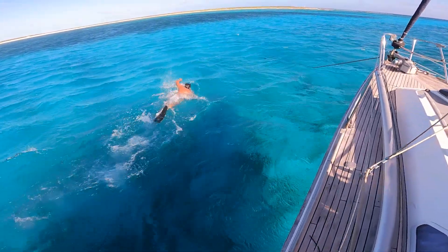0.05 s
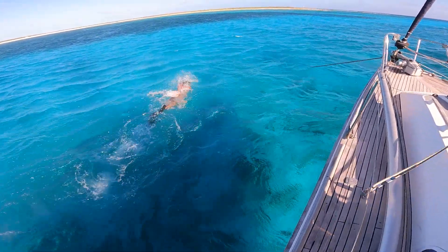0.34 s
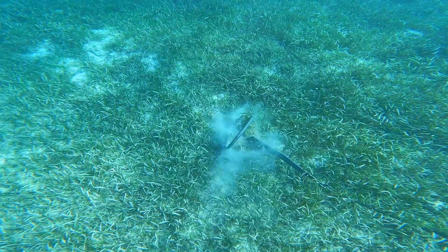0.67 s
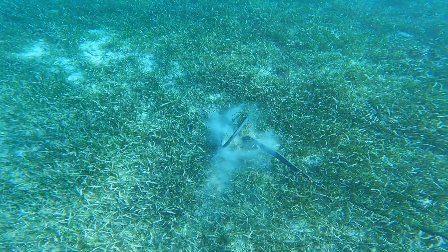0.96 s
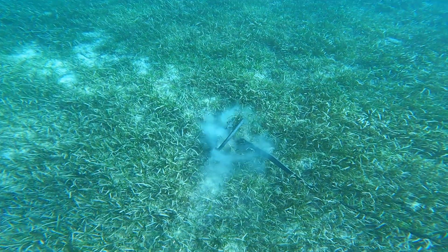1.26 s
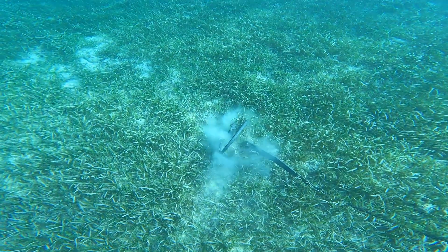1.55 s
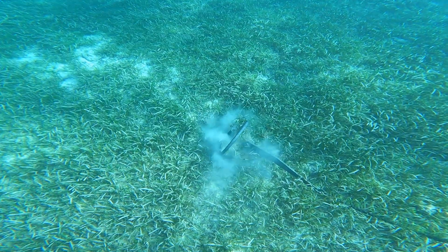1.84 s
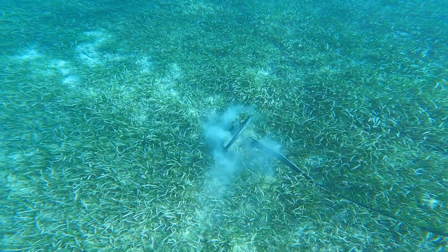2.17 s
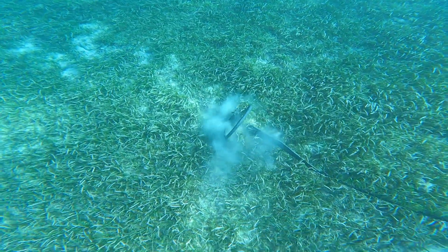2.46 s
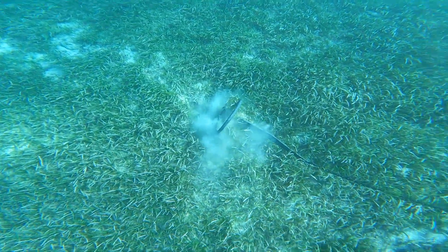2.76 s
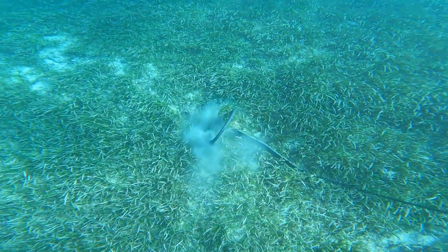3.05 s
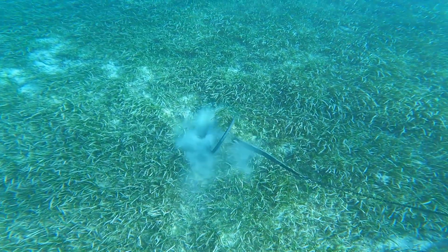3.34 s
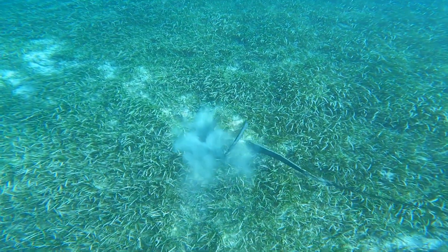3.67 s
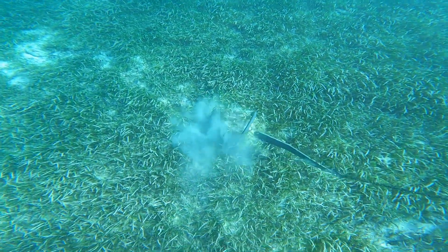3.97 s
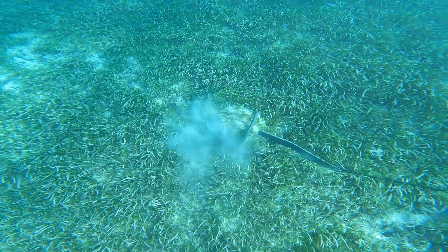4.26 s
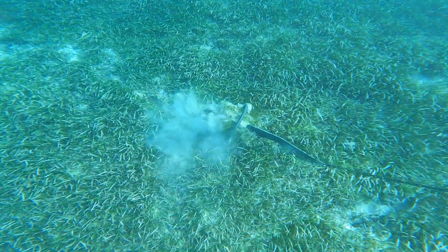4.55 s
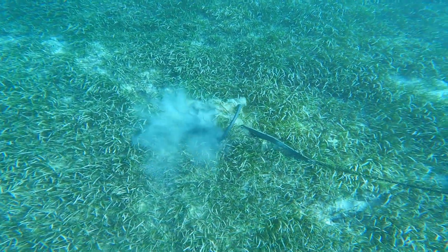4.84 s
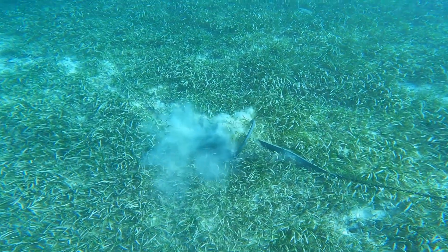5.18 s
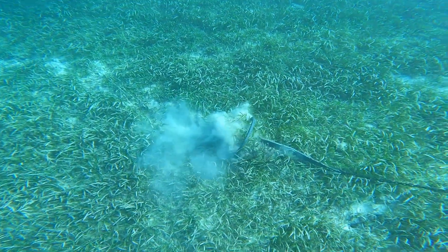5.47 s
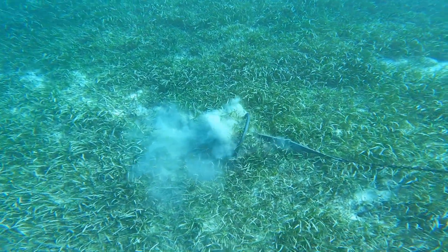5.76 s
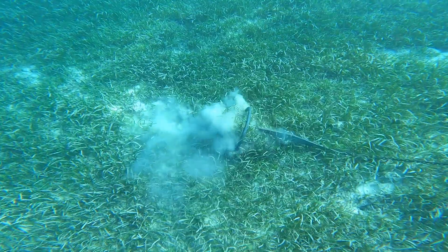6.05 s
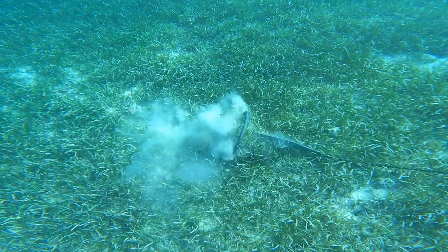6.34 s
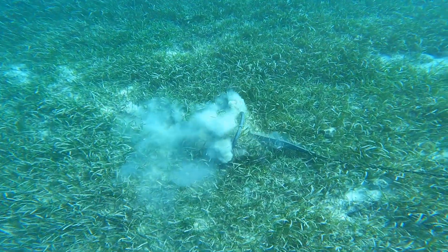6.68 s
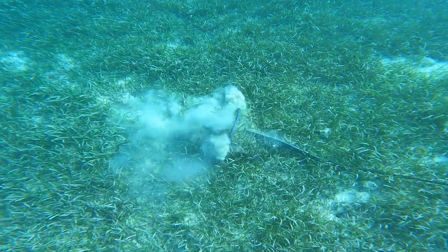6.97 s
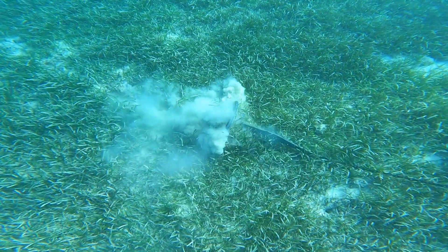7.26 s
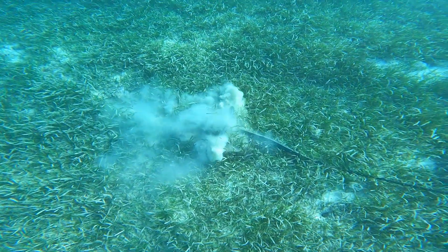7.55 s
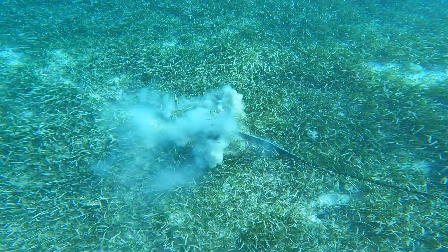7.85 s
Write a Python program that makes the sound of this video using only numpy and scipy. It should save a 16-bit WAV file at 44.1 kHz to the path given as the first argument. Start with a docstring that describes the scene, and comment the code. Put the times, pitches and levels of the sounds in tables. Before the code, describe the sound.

A moment of wind and light splashing on deck cuts with a click to a microphone under water in a sealed case. Bubbles rush and fizz dully while a boat hums. An anchor then ploughs the sea bed in jerks, with gritty crunches, small snaps and a hollow ring, as soft thumps hit the case. Things quieten to close sloshes, gulping bubbles and taps, before a click and a hard gust at the very end.

```python
"""Wind buffets a camera's microphone on a yacht's deck while a swimmer splashes beside the boat.
With a click we are under water, above an anchor ploughing through sea grass, all muffled by the
waterproof case. The boat drones in a dense wash of collapsing bubbles; midway the anchor sticks and
slips, crunching grit and cracking shells. The wash dies away to sloshes and knocks on the case.
Another click, and a harder gust hits the microphone on deck."""
import sys
import numpy as np
from scipy import signal
from scipy.fft import rfft, irfft, next_fast_len
from scipy.io import wavfile
from scipy.ndimage import uniform_filter1d

SR = 44100
rng = np.random.default_rng(int(sys.argv[2]) if len(sys.argv) > 2 else 0)


def unload_wav(signal):
    """Save mono or channel-first audio to the path in sys.argv[1] as 16-bit WAV at rate SR, clipped to [-1, 1]."""
    wavfile.write(
        sys.argv[1],
        SR,
        np.round(np.clip(np.atleast_2d(signal).T, -1, 1) * 32767).astype(np.int16),
    )


N = 357649
TIME = np.arange(N) / SR
DIVE_S, SURFACE_S = .478, 7.945
WALL_HZ = 3700  # the case wall shuts out the ring of grit and shells above this
SPURT_RISE_S = .0029


def undb(db):
    """Decibels to gain."""
    return 10 ** (np.asarray(db) / 20)


def unit(x):
    """Scale to rms 1."""
    return x / np.sqrt(np.mean(x ** 2))


def gain(table):
    """Gain along a (time [s], level [dB]) curve, held beyond its ends."""
    return undb(np.interp(TIME, *np.transpose(table)))


def ramp(s, rise_s):
    """Rise from 0 to 1, starting at time s."""
    return np.clip((TIME - s) / rise_s, 0, 1)


def burst(s, attack_s, hold_s, decay_s):
    """Envelope that rises from time s, holds at 1 and dies away."""
    return ramp(s, attack_s) * np.exp(-np.clip((TIME - s - attack_s - hold_s) / decay_s, 0, 20))


def spurts(events, decay_s):
    """Envelope that leaps at each (time [s], level [dB]) event and dies away."""
    kicks = np.zeros(N)
    for s, db in events:
        kicks[int(s * SR)] += undb(db)
    rise = np.hanning(int(SPURT_RISE_S * SR))
    return signal.lfilter(rise / rise.sum(), [1, -np.exp(-1 / (decay_s * SR))], kicks + 1e-18)


def walk(rate):
    """Smooth random wander with spread 1."""
    step = max(int(SR / rate), 1)
    return unit(uniform_filter1d(np.repeat(rng.standard_normal(N // step + 1), step), step)[:N])


def pops(rate, spread_db):
    """Random impulses, so many a second, of varying size."""
    hit = rng.random(N) < rate / SR
    size = undb(spread_db * np.clip(rng.standard_normal(N), -2.5, 2.5))
    return hit * size * rng.choice([-1, 1], N)


def colour(x, points):
    """Causal filter through (frequency [Hz], level [dB]) points, falling steeply past the ends; rms 1."""
    size = next_fast_len(N + SR, True)
    size += size % 2
    hz, db = np.transpose(points)
    octave = np.log2(np.maximum(np.fft.rfftfreq(size, 1 / SR), 1))
    beyond = np.abs(octave - np.clip(octave, np.log2(hz[0]), np.log2(hz[-1])))
    log_gain = np.log(undb(np.interp(octave, np.log2(hz), db) - 36 * np.minimum(beyond, 2)))
    cepstrum = irfft(log_gain)
    cepstrum[1:size // 2] *= 2  # fold to minimum phase
    cepstrum[size // 2 + 1:] = 0
    return unit(irfft(rfft(x, size) * np.exp(rfft(cepstrum)), size)[:N])


def muffle(x, hz, order=4):
    """Shut out the treble above hz."""
    return signal.sosfilt(signal.butter(order, hz, fs=SR, output="sos"), x)


def resonate(x, modes):
    """Sum of resonances (frequency [Hz], width [Hz], level [dB]), each filtering twice."""
    out = 0
    for hz, width, db in modes:
        b, a = signal.iirpeak(hz, hz / width, fs=SR)
        out = out + undb(db) * signal.lfilter(b, a, signal.lfilter(b, a, x))
    return out


def ringing(drive, pitch, width_hz):
    """A narrow resonance that follows a (time [s], pitch [Hz]) curve; rms 1."""
    turn = np.exp(2j * np.pi * np.cumsum(np.interp(TIME, *np.transpose(pitch))) / SR)
    return unit((muffle(drive / turn, width_hz / 2, order=2) * turn).real)


def steady(x, span_s, slack):
    """Even out swings in level, less so with more slack; rms 1."""
    return unit(x / np.sqrt(uniform_filter1d(x ** 2, int(span_s * SR)) + slack))


def place(out, s, peak_db, sound):
    """Add a short sound to out at time s, scaled to the given peak."""
    span = out[int(s * SR):][:len(sound)]
    span += undb(peak_db) * sound[:len(span)] / np.abs(sound).max()


def strike(events, modes, top_hz, rise_s):
    """Noisy taps (time [s], peak [dB], t60 [s]) ring the modes, dulled above top_hz."""
    out = np.zeros(N)
    age = np.arange(SR // 5) / SR
    for s, db, t60 in events:
        scrape = rng.standard_normal(len(age)) * np.minimum(age / rise_s, 1) * undb(-60 * age / t60)
        place(out, s, db, muffle(resonate(scrape, modes), top_hz))
    return out


# Breeze, then gust, right on the microphone: (frequency [Hz], level [dB])
BREEZE_COLOUR = [(20, -10.5), (64, -7.5), (120, -8), (206, -12.5), (412, -19.5), (490, -18.5), (608, -21.5),
                 (860, -21), (1320, -30.5), (1550, -41.5), (1870, -36.5), (2350, -44.5), (2640, -59)]
GUST_COLOUR = [(20, -1), (35, -10), (52, 4), (78, 4), (100, 0.5), (130, -5.5), (206, -2), (285, -8.5),
               (480, -17.5), (640, -23), (900, -30.5), (1250, -40), (1600, -46.5), (2500, -51)]
# The open sea, from the deck: (frequency [Hz], level [dB])
SEA_HISS = [(2600, 0), (3500, -0.5), (4500, -2), (5500, -6), (7000, -9), (8500, -14), (10000, -21),
            (12000, -34), (15000, -50)]

def wind(spectrum, eddies_db, sea_db):
    """Eddies buffet the microphone port without a break, over the hiss and spatter of the sea."""
    eddies = steady(colour(rng.standard_normal(N), spectrum), span_s=.03, slack=.3)
    spatter = rng.standard_normal(N) + .8 * unit(pops(rate=420, spread_db=4))
    hiss = colour(spatter * undb(.41 * walk(61)), SEA_HISS)
    return undb(eddies_db) * eddies + undb(sea_db) * hiss


# Strokes beside the boat, from the deck: (time [s], peak [dB], t60 [s])
SPATTERS = [(.033, -31.5, .11), (.117, -34, .04), (.147, -37, .02), (.184, -35, .04), (.256, -34, .05),
            (.286, -36, 0.022), (.338, -34, .025), (.431, -33, .025)]
# Ring of the spatters and the spray: (frequency [Hz], width [Hz], level [dB])
SPATTER_MODES = [(1610, 1100, 8), (4350, 2400, -19)]
SPRAY_MODES = [(4500, 1300, 3), (7300, 2000, -7)]

def swimmer():
    """A swimmer beside the boat throws up separate spatters, then a bright spray."""
    spray = ramp(.28, rise_s=.08) * unit(resonate(pops(rate=2800, spread_db=3), SPRAY_MODES))
    return strike(SPATTERS, SPATTER_MODES, top_hz=8050, rise_s=.0005) + undb(-65) * spray


def clicks():
    """A sharp click marks each change of place."""
    return undb(-17.5) * sum(burst(s, 1 / SR, hold_s=0, decay_s=.000091) for s in (DIVE_S, SURFACE_S))


# Bubbles under water, giving way as the anchor bites, then dying quickly: (time [s], level [dB])
WASH_LEVEL = [(0.5, -28), (3.0, -27.5), (3.6, -35), (5.2, -32), (6.15, -30), (6.52, -32.5), (6.6, -41),
              (7.2, -48), (7.93, -49.5)]
# Their body and their fizz, through the case: (frequency [Hz], level [dB])
WASH_COLOUR = [(120, -36), (186, -9), (212, -2.5), (259, -13), (294, -3), (385, -6.5), (449, 1), (707, 1),
               (741, 0.5), (832, -21), (934, -2.5), (1130, -1), (1270, -9.5), (1410, -1), (1560, -4.5),
               (2000, -30), (2600, -65.5), (4400, -120)]
FIZZ_COLOUR = [(1120, -33.5), (1900, 1), (2020, -12), (2200, 0.5), (2480, -7.5), (2680, -7), (2930, -13),
               (3120, -22.5), (3500, -25), (4550, -48.5), (7700, -120)]

def wash():
    """Thousands of bubbles collapse each second in uneven surges; knocks shake more of them loose."""
    body = colour(pops(rate=7000, spread_db=2), WASH_COLOUR)
    fizz = colour(pops(rate=4300, spread_db=2), FIZZ_COLOUR) * undb(.73 * walk(50))
    fizz_gain = undb(-20.5 - 3.5 * ramp(5.82, rise_s=.18))  # the smallest bubbles thin out first
    flow = gain(WASH_LEVEL) * undb(.9 * walk(14) + .96 * walk(45))
    shaken = spurts([(s, db - 15.5) for s, db, _ in KNOCKS], decay_s=.027)
    return np.hypot(flow, shaken) * (body + fizz_gain * fizz)


# The boat, from under water: (time [s], level [dB])
DRONE_LEVEL = [(0.5, -34.5), (2.85, -33.5), (3.0, -39), (4.5, -37.5), (6.1, -35.5), (6.25, -40.5),
               (6.7, -71.5)]
# Its main tone: (time [s], pitch [Hz])
DRONE_PITCH = [(0.499, 155), (1.101, 165), (2.798, 167.9), (3.1, 160), (4.601, 164.6), (5.301, 155.5),
               (6.299, 160)]

def drone(undertone_hz=153):
    """The boat hums: a wavering tone beats against a weaker steady one, over a little churning."""
    hum = steady(ringing(rng.standard_normal(N), DRONE_PITCH, width_hz=22), span_s=.09, slack=.2)
    under = steady(ringing(rng.standard_normal(N), [(0, undertone_hz)], width_hz=7), span_s=.1, slack=.6)
    churn = ringing(rng.standard_normal(N), DRONE_PITCH, width_hz=93)
    level = gain(DRONE_LEVEL) * undb(walk(17))
    return level * (undb(-2.5) * hum + undb(-11) * under + undb(-13.5) * churn)


# Water pressure right on the case: (time [s], level [dB])
SWAY_LEVEL = [(0.5, -43), (3.3, -41.5), (4.7, -48), (6.2, -44.5), (7.2, -42.5), (7.9, -38)]
# Swells on top of it: (centre time [s], length [s], level [dB])
SWELLS = [(3.13, 0.15, -43), (3.6, 0.12, -37), (4.956, 0.065, -38), (5.698, 0.26, -30.5),
          (7.524, 0.22, -41.5)]
# Their rumble at the microphone: (frequency [Hz], level [dB])
SWAY_COLOUR = [(12, -10.5), (20, -0.5), (30, -0.5), (42, 0), (58, -10), (85, -12), (125, -19.5)]

def sway():
    """Moving water presses slowly on the case, harder with each swell."""
    swells = sum(undb(db) * np.exp(-np.minimum((2 * (TIME - s) / length) ** 2, 20))
                 for s, length, db in SWELLS)
    return (gain(SWAY_LEVEL) + swells) * colour(rng.standard_normal(N), SWAY_COLOUR)


# Crackle of the sea bed below the microphone: (frequency [Hz], level [dB])
CRACKLE_COLOUR = [(1200, 7), (2300, -10), (2750, 2.5), (3100, -10), (3500, -6.5), (3950, -12),
                  (4400, -20.5), (6300, -27.5), (8000, -45.5)]
# Lone ticks down there: (time [s], peak [dB], t60 [s])
TICKS = [(.55, -58, .01), (.87, -54, .008), (1.235, -55, .008), (1.33, -52.5, .01)]
# Their ring: (frequency [Hz], width [Hz], level [dB])
TICK_MODES = [(3580, 900, 0.5), (6200, 1500, -15)]

def sea_bed():
    """The sea bed crackles faintly: near snaps and lone ticks stand out from a distant blur."""
    near = .45 * unit(pops(rate=90, spread_db=4))
    distant = .97 * rng.standard_normal(N)
    ticks = strike(TICKS, TICK_MODES, top_hz=7000, rise_s=.0003)
    return undb(-64.5) * colour(near + distant, CRACKLE_COLOUR) + ticks


# Large bubbles, heard under water: (time [s], peak [dB], pitch [Hz], 60 dB decay [cycles])
GULPS = [(1.032, -20.5, 1185, 41), (1.122, -17, 683, 43), (3.597, -13, 484, 4.8), (3.600, -29, 48.3, 3.7),
         (4.884, -20, 358, 16), (4.880, -24, 166, 18), (4.930, -18.5, 319, 24), (5.369, -38, 198, 6),
         (5.823, -25, 154, 28), (6.605, -24, 470, 11), (6.826, -26, 640, 10), (6.879, -28, 517, 10),
         (7.148, -32, 620, 28), (7.208, -27, 221, 4.4), (7.308, -24.5, 478, 43), (7.378, -21.5, 520, 21),
         (7.447, -19, 155, 5.1), (7.450, -23.5, 507, 8.9), (7.472, -26.5, 86.4, 3), (7.882, -31, 398, 240)]

def gulps(glide=.04, attack_cycles=.25):
    """Each large bubble rings briefly, rising a little in pitch."""
    out = np.zeros(N + SR)
    age = np.arange(SR // 4) / SR
    for s, db, hz, cycles in GULPS:
        life = age * hz / cycles
        shape = (1 - np.exp(-age * hz / attack_cycles)) ** 2 * undb(-60 * life)
        tone = np.sin(2 * np.pi * hz * age * (1 + glide * life))
        out[int(s * SR):int(s * SR) + len(age)] += undb(db) * shape / shape.max() * tone
    return out[:N]


# How hard the anchor ploughs below the microphone; drives crunch, grit and sand: (time [s], level [dB])
PULL = [(2.8, -38.5), (3.2, -27.5), (3.65, -26), (4.3, -24), (5.0, -27), (5.7, -28.5), (6.5, -35.5),
        (6.75, -47)]
# Its crunch, through the case: (frequency [Hz], level [dB])
CRUNCH_COLOUR = [(130, -54), (220, -11.5), (305, -10), (463, -2), (595, -1.5), (724, -6), (853, -11),
                 (973, -3.5), (1250, -25), (1520, -14), (1900, -21), (2230, -27), (2520, -40), (3000, -61),
                 (3900, -70), (6600, -120)]
# Its hollow ring, sinking as it digs in: (time [s], pitch [Hz])
RING_PITCH = [(3.15, 612), (3.55, 608), (3.72, 598), (3.9, 590), (3.98, 599), (4.1, 547), (4.3, 578),
              (4.55, 577), (4.7, 611), (4.92, 611), (5.07, 568), (5.8, 606), (6.6, 574)]
# Strength of that ring: (time [s], level [dB])
RING_LEVEL = [(2.9, -50), (3.2, -33.5), (3.6, -33), (4.5, -38), (4.95, -31), (5.3, -34), (5.8, -35),
              (6.4, -40), (6.75, -50)]
# Stretches of even sliding: (time [s], hold [s], level [dB])
SLIDES = [(3.16, 0.34, -34), (3.493, 0.46, -31), (4.657, 0.076, -31.5), (4.87, 0.027, -26),
          (5.02, 0.045, -29.5)]

def anchor(fade_s=.025):
    """Each slip through the sand gives a dull crunch and a hollow ring; even sliding makes it hum."""
    jerks = undb(1.2 * walk(45))
    slips = unit(pops(rate=2200, spread_db=2.5) * jerks)
    crunch = gain(PULL) * undb(-4) * colour(slips, CRUNCH_COLOUR)
    ring = gain(RING_LEVEL) * steady(ringing(slips, RING_PITCH, width_hz=169), span_s=.027, slack=.5)
    sliding = sum(undb(db) * burst(s, fade_s, hold, fade_s) for s, hold, db in SLIDES)
    hum = steady(ringing(rng.standard_normal(N), RING_PITCH, width_hz=29), span_s=.03, slack=.08)
    return stick_slip() * (crunch + ring + grit(jerks) + grass_and_sand()) + sliding * hum


# Grit under the flukes, through the case: (frequency [Hz], level [dB])
GRIT_COLOUR = [(1000, -34), (1700, -1.5), (1880, 1.5), (2200, -0.5), (2450, -12.5), (2800, -14),
               (3000, -31.5)]
# Its bright ring, shifting with their bite: (time [s], pitch [Hz])
GRIT_PITCH = [(3.1, 3660), (3.9, 3580), (4.3, 3315), (4.7, 3170), (5.1, 3320), (5.5, 3505), (6.2, 3200)]

def grit(jerks):
    """Grains crack in rounded clusters under the flukes."""
    clusters = undb(3.8 * np.clip(walk(130), -2, 1.6))
    grains = unit(pops(rate=1100, spread_db=3.2) * jerks * clusters)
    bright = muffle(ringing(grains, GRIT_PITCH, width_hz=680), WALL_HZ, order=10)
    return gain(PULL) * (undb(-25) * colour(grains, GRIT_COLOUR) + undb(-32) * bright)


# Flukes dragged through the grass below: (time [s], hold [s], rasp level [dB], sand level [dB])
RASPS = [(2.965, 0.34, -33, -78.5), (4.169, 0.3, -45.5, -78)]
# Grass and fine sand, as they reach the microphone: (frequency [Hz], level [dB])
RASP_COLOUR = [(850, 1), (1050, 5), (1300, 7), (1650, -28), (2100, -10.5), (2600, -8.5), (3100, -43.5),
               (3800, -22), (4000, -25.5), (4400, -45)]
SAND_COLOUR = [(3800, -4), (4030, 2), (4300, -7), (4700, 1.5), (5200, -2.5), (5650, -1.5), (6200, -10),
               (6650, -7.5), (7500, -22.5), (8150, -11.5), (9000, -25.5), (10500, -37.5)]
# The sand's thin ring, sinking as the flukes bury themselves: (time [s], pitch [Hz])
SAND_PITCH = [(3.1, 5390), (3.55, 5560), (3.95, 5130), (4.4, 4640), (5.0, 4860), (6.2, 4990)]

def grass_and_sand():
    """Grass rasps in coarse tugs and stirs up more of the sand that hisses round the flukes."""
    clusters = undb(3 * np.clip(walk(170), -2, 1.6))
    tugs = 1.1 * unit(pops(rate=750, spread_db=4) * clusters)
    rasp_gain, sand_gain = 0, undb(-57) * gain(PULL)
    for s, hold, rasp_db, sand_db in RASPS:
        drag = burst(s, attack_s=.21, hold_s=hold, decay_s=.19)
        rasp_gain += undb(rasp_db) * drag
        sand_gain += undb(sand_db) * drag
    hiss = undb(-2.5) * colour(tugs, SAND_COLOUR) + undb(-6.5) * ringing(tugs, SAND_PITCH, width_hz=480)
    return rasp_gain * colour(tugs, RASP_COLOUR) + sand_gain * hiss


# Shells crushed under the anchor, levels before each part's trim:
# (time [s], ring peak [dB], ring pitch [Hz], crack peak [dB], puff level [dB])
SNAPS = [(3.1058, -37, 2900, -42, -65), (3.1896, -40, 3690, -32.5, -68), (3.28, -43, 3190, -33, -66),
         (3.3284, -38, 3450, -36, -67), (3.3712, -40, 3170, -37, -67), (3.4396, -45, 3770, -38, -65),
         (3.454, -42, 3700, -37, -63), (3.4685, -40, 3710, -35, -66), (3.4848, -39, 3030, -32, -70),
         (3.5548, -42, 3440, -35, -64.5), (3.7184, -40, 3610, -36, -64), (3.8781, -44, 3380, -40, -72),
         (3.9335, -42, 3480, -35, -67.5), (4.0046, -44, 3570, -41, -73), (4.066, -42, 3640, -35, -65),
         (4.0861, -37, 3410, -30, -64), (4.0994, -39, 3410, -41, -66), (4.1164, -38, 3100, -42, -68),
         (4.1879, -40, 3160, -38, -77), (4.2765, -42, 3200, -37, -70), (4.3036, -42, 3130, -38, -69),
         (4.3151, -38, 3410, -34, -69), (4.344, -37, 3340, -39, -65), (4.3622, -43, 3290, -33, -63),
         (4.3703, -38, 3150, -32, -61), (4.3764, -42, 3460, -36, -67), (4.4383, -41, 3130, -39, -69),
         (4.4697, -39, 3360, -36, -66), (4.5747, -36, 3180, -38, -68), (4.5874, -35, 3240, -36, -67),
         (4.6359, -42, 3210, -37, -68), (4.7383, -34, 3130, -35, -68), (4.7558, -43, 3080, -33, -67),
         (4.8204, -44, 3130, -37, -73), (4.9526, -40, 3330, -39, -69), (4.9851, -41, 3090, -41, -70),
         (4.999, -38, 3070, -38, -70), (5.0222, -41, 3210, -35, -70), (5.1223, -43, 3600, -42, -72),
         (5.1412, -41, 3200, -37, -72), (5.234, -36, 3360, -36, -70), (5.2667, -35.5, 3600, -34, -70),
         (5.46, -41, 3290, -35, -70), (5.5892, -41.5, 3820, -38, -75), (5.6388, -34.5, 3430, -33, -67),
         (5.6994, -39, 3130, -41, -76), (5.7758, -36, 3270, -38, -70), (5.8102, -41, 3450, -42, -74),
         (6.0162, -40, 3120, -33, -68), (6.0761, -41, 3190, -37, -68), (6.1707, -35, 3180, -40, -71),
         (6.77, -50, 3290, -54, -68)]

def shells(crack_hz=2000, width_hz=680, rise_s=.001):
    """Each shell breaks with one sharp fracture: a bright ring, a crack and a puff of sand."""
    out = np.zeros(N)
    age = np.arange(SR // 16) / SR
    for s, ring_db, ring_hz, crack_db, _ in SNAPS:
        fracture = rng.standard_normal(len(age)) * age * np.exp(-age / rise_s)
        for hz, db in (ring_hz, ring_db - 1), (crack_hz, crack_db + 6):
            place(out, s, db, muffle(resonate(fracture, [(hz, width_hz, 0)]), WALL_HZ, order=10))
    puffs = spurts([(s, db + 3.5) for s, *_, db in SNAPS], decay_s=.0035)
    return out + puffs * colour(rng.standard_normal(N), SAND_COLOUR)


# The anchor sticking in the sea bed: (release time [s], stall length [s], depth [dB])
STALLS = [(3.645, 0.1, -4), (3.826, 0.061, -2), (4.177, 0.047, -10.5), (4.239, 0.063, -4),
          (4.305, 0.064, -5.5), (4.436, 0.052, -8), (4.524, 0.016, -3), (4.799, 0.052, -5),
          (4.858, 0.024, -0.5), (4.884, 0.025, -9), (5.063, 0.015, -4)]

def stick_slip(lurch_db=-14.5):
    """Gain of the anchor's motion: it sinks during each stall and leaps back with a lurch."""
    stuck_db = sum(db * ramp(s - length, length / 2) * (TIME < s) for s, length, db in STALLS)
    lurch = spurts([(s, lurch_db) for s, _, _ in STALLS], decay_s=.011)
    return uniform_filter1d(undb(stuck_db), int(SPURT_RISE_S * SR)) + lurch


# Bumps right on the case: (time [s], peak [dB])
THUMPS = [(3.947, -12), (4.886, -23), (4.901, -16.5), (4.935, -16)]
# Its low ring, from inside: (frequency [Hz], width [Hz], level [dB])
THUMP_MODES = [(170, 230, -2), (307, 260, -1)]

def thumps():
    """Soft, heavy bumps shake the whole case for a few cycles."""
    out = np.zeros(N)
    thud = muffle(resonate(signal.unit_impulse(SR // 10), THUMP_MODES), hz=620)
    for s, db in THUMPS:
        place(out, s, db, thud)
    return out


# Knocks on the case, close to the microphone: (time [s], peak [dB], t60 [s])
KNOCKS = [(4.087, -20, 0.037), (5.357, -23, 0.065), (6.018, -20.5, 0.029), (6.258, -26.5, 0.041),
          (6.532, -20, 0.038), (6.686, -40, 0.026), (6.752, -29.5, 0.026), (7.148, -29.5, 0.028),
          (7.388, -34, 0.04), (7.477, -16, 0.032), (7.699, -23, 0.028), (7.799, -27.5, 0.077),
          (7.821, -24, 0.06)]
# The case's modes: (frequency [Hz], width [Hz], level [dB])
CASE_MODES = [(650, 570, -8), (1100, 640, 20.5), (1390, 280, 10), (1940, 150, 7), (2700, 120, -24)]

def knocks():
    """Short scraping taps ring the case, dulled by its wall."""
    return strike(KNOCKS, CASE_MODES, top_hz=2300, rise_s=.003)


# Sloshes close round the case: (time [s], hold [s], level [dB])
SLOSHES = [(6.552, 0.049, -40), (6.791, 0.22, -32), (7.12, .01, -38.5), (7.226, 0.26, -41),
           (7.914, .02, -40)]
# Their colour from inside: (frequency [Hz], level [dB])
SLOSH_COLOUR = [(53, -26), (90, -16), (155, -11), (225, -10), (347, -3.5), (549, -9), (597, -1),
                (1070, -21.5), (1540, -25.5), (1840, -63), (2500, -59.5), (3250, -80), (5500, -120)]

def sloshes(attack_s=.023, decay_s=.064, lapping_from_s=6.8):
    """Water sloshes round the case and laps gently in between."""
    sloshing = sum(undb(db) * burst(s, attack_s, hold, decay_s) for s, hold, db in SLOSHES)
    lapping = undb(-45) * ramp(lapping_from_s, attack_s)
    churn = pops(rate=2200, spread_db=1.5) * undb(1.2 * walk(110))
    return np.hypot(sloshing, lapping) * colour(churn, SLOSH_COLOUR)


def trickle(from_s=6.6):
    """Single small bubbles tap the case as the wash dies."""
    taps = unit(muffle(resonate(pops(rate=48, spread_db=3.5), CASE_MODES), hz=2800))
    return undb(-51.5) * ramp(from_s, rise_s=.023) * taps


def scene(switch_s=.001):
    """One microphone, changing place abruptly: on deck, under water above the anchor, on deck again."""
    breeze = wind(BREEZE_COLOUR, eddies_db=-26, sea_db=-61) + swimmer()
    below = wash() + drone() + sway() + sea_bed() + gulps() + anchor() + shells()
    on_case = thumps() + knocks() + sloshes() + trickle()
    gust = wind(GUST_COLOUR, eddies_db=-15.5, sea_db=-57)
    dived, surfaced = (ramp(s - switch_s / 2, switch_s) for s in (DIVE_S, SURFACE_S))
    return ((1 - dived) * breeze + (dived - surfaced) * (below + on_case) + surfaced * gust + clicks())[None]


def record(dry):
    """The camera cuts the treble above 15.8 kHz."""
    return signal.sosfilt(signal.ellip(8, .2, 80, 15800, fs=SR, output="sos"), dry)


dry = scene()
out = record(dry)
unload_wav(out)
```